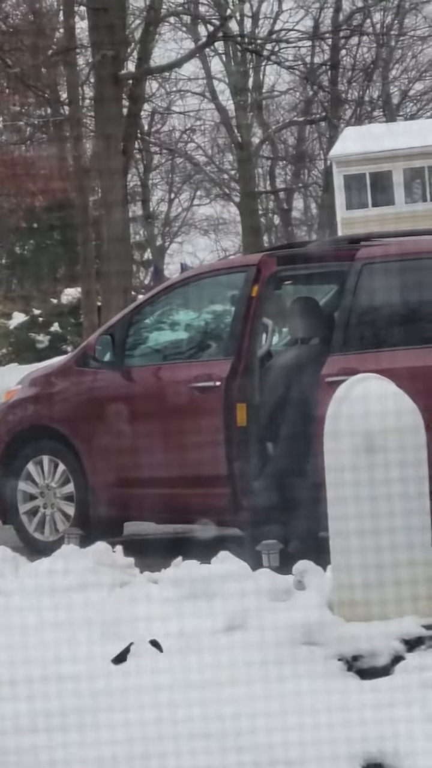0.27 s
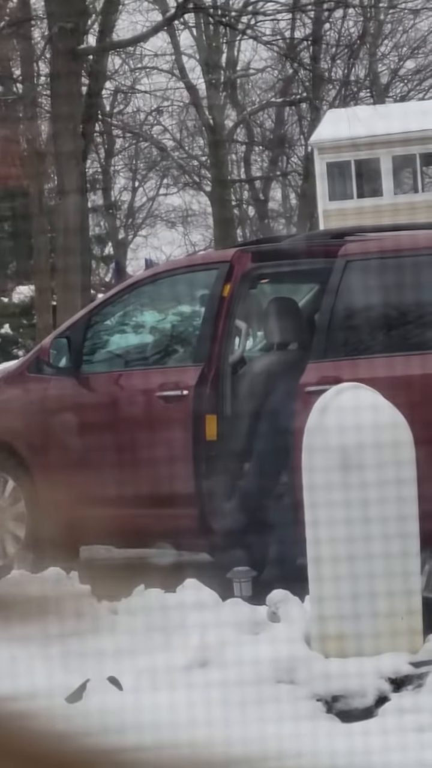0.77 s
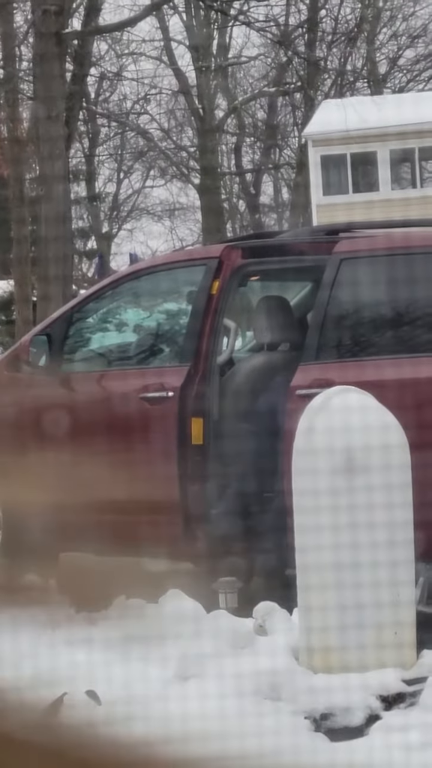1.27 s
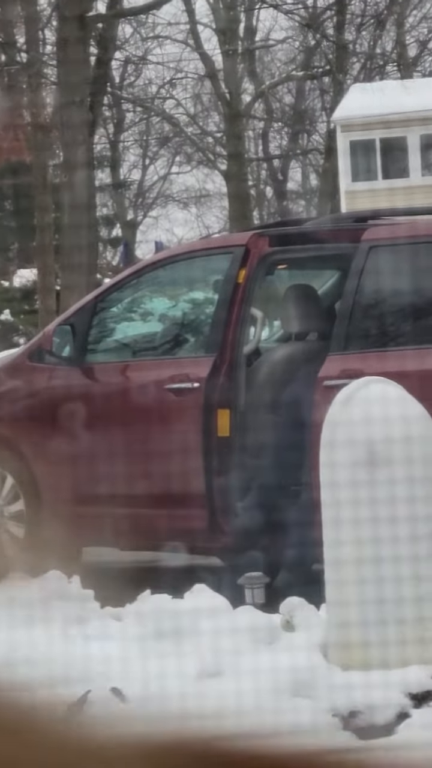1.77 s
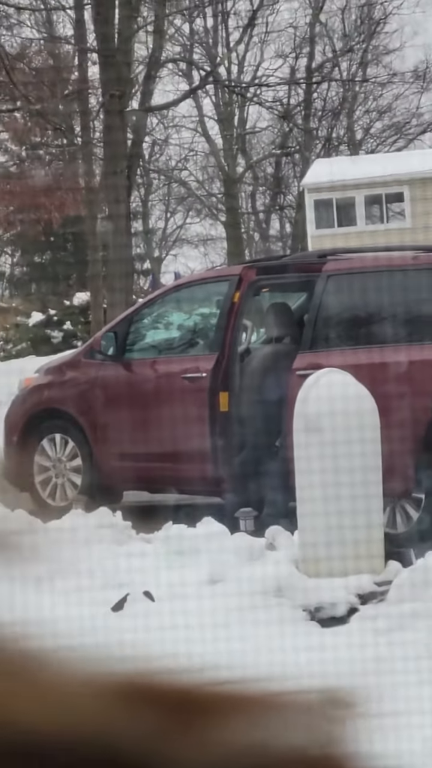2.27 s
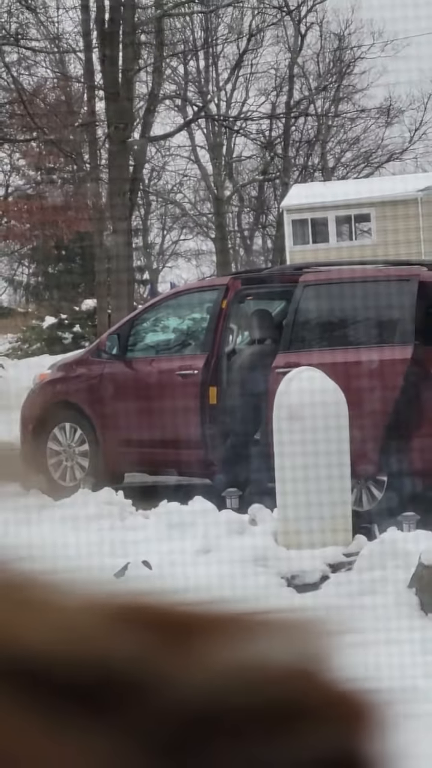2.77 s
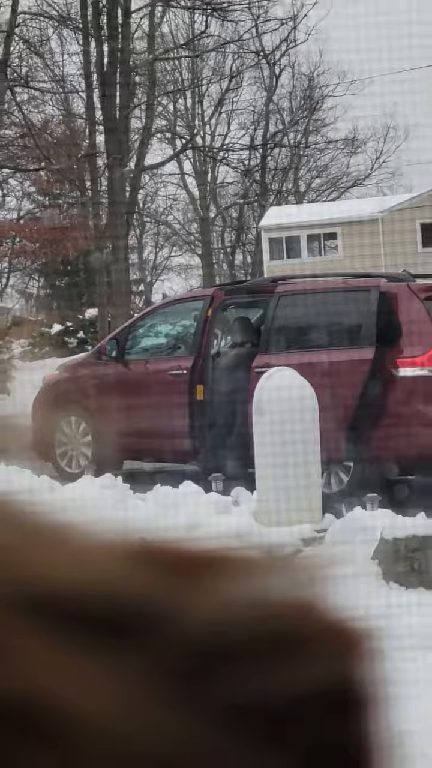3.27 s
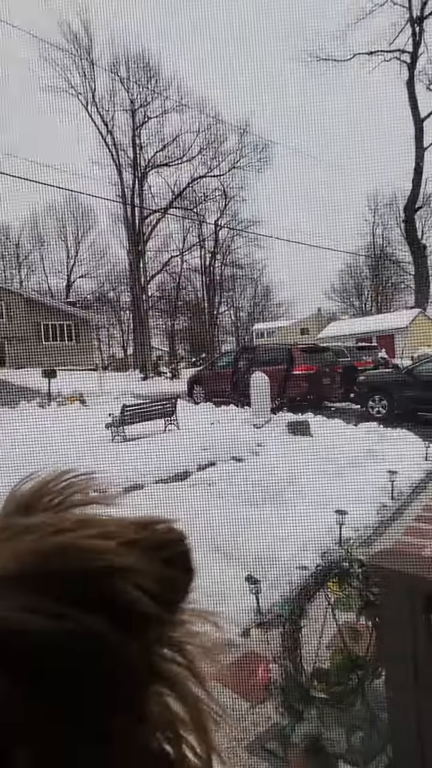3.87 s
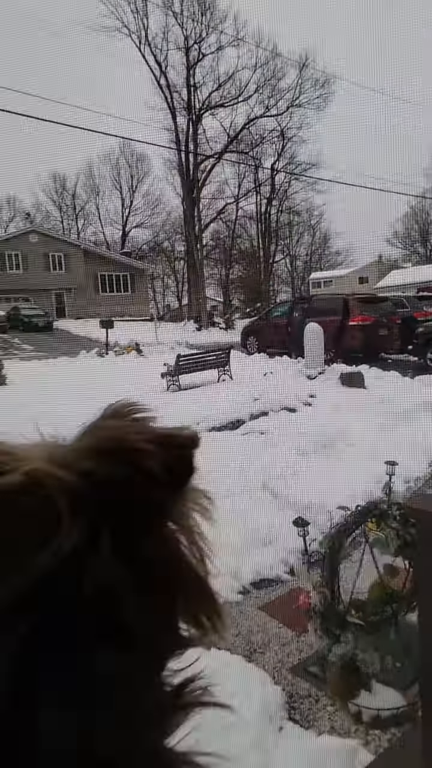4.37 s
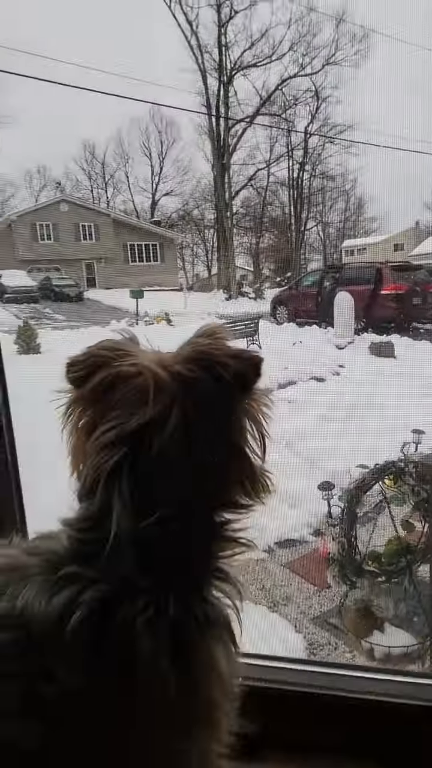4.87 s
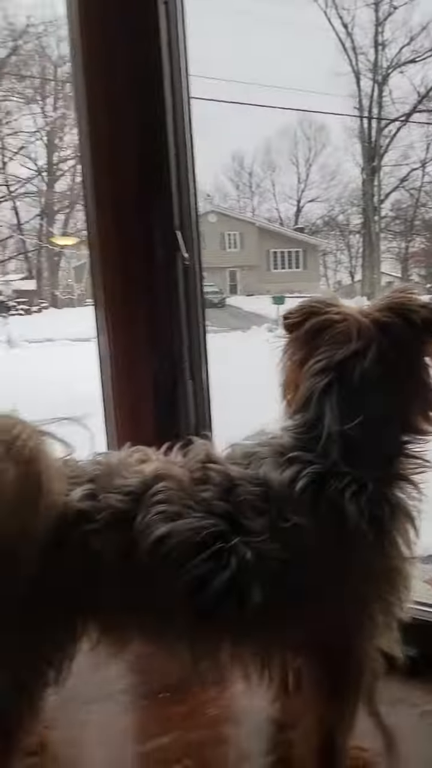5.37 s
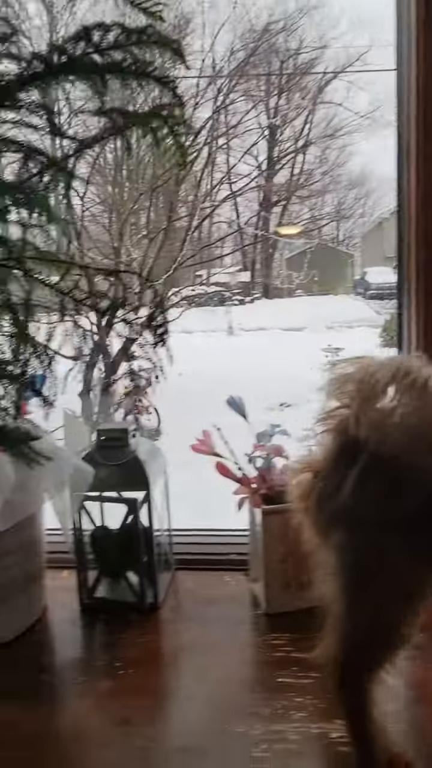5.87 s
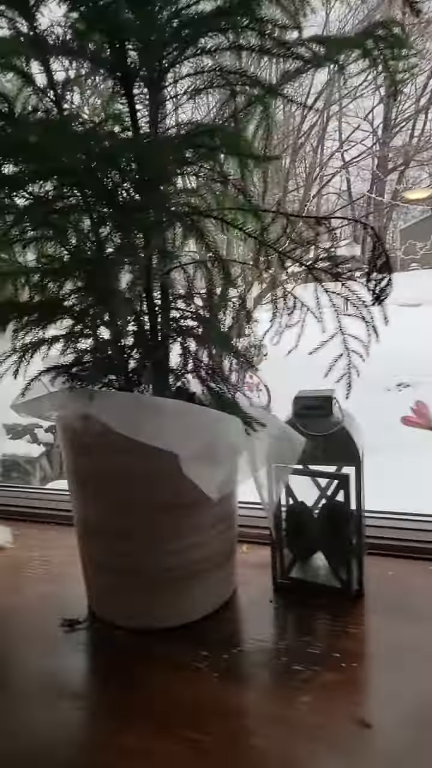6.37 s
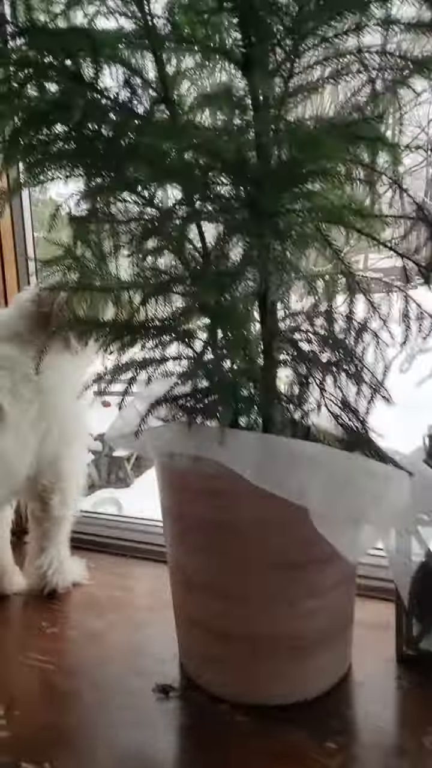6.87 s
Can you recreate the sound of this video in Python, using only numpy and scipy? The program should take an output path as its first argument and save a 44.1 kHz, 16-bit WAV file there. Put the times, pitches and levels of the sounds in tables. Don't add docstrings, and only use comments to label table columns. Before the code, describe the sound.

Several small dogs bark, yelp and howl excitedly over one another in a hard-floored room, then fade to a growl and one low woof.

```python
import sys
import numpy as np
from scipy import signal
from scipy.fft import rfft, irfft, next_fast_len
from scipy.io import wavfile
from scipy.ndimage import uniform_filter1d, minimum_filter1d, map_coordinates

SR = 44100
rng = np.random.default_rng(int(sys.argv[2]) if len(sys.argv) > 2 else 0)


def invert_db(x):
    u = np.asarray(x, float) / 20
    return 10 ** u


def store_pcm(level_fs):
    pcm = np.round(np.clip(level_fs, -1, 1) * 32767).astype(np.int16)
    wavfile.write(sys.argv[1], SR, np.atleast_2d(pcm).T)


N = 314433

# (frequency [Hz], density [dB per Hz])
TEETH_HISS = [(1500, -38.5), (2600, -13), (3300, -11.5), (4000, -17), (5200, 3.5), (7000, -1.5),
              (8400, -1.5), (10600, -16), (12400, 1.5), (14500, -2.5), (15700, -13)]
# (frequency [Hz], share [0-1])
MOUTH_RING = [(1500, 0.63), (1950, 0.16), (2250, 1.1), (2650, 0.37), (3300, 0.32), (5000, 0.05)]


def unit(x):
    return x / np.sqrt(np.mean(x ** 2) + 1e-20)


def along(points, hz):
    f, v = np.transpose(points)
    return np.interp(np.log(hz + 1), np.log(f + 1), v)


def curves(rows):
    s, *columns = np.transpose(rows)
    start = round(s[0] * SR)
    t = np.arange(start, min(N, round(s[-1] * SR))) / SR
    return start, [np.interp(t, s, column) for column in columns]


def wobble(size, rate):
    return map_coordinates(rng.standard_normal(3000), [np.arange(size) * rate / SR])


def filtered(x, response):
    n = x.shape[-1]
    m = next_fast_len(n + 8192)
    return irfft(rfft(x, m) * response(np.fft.rfftfreq(m, 1 / SR)), m)[..., :n]


def resonant(modes):
    def response(f):
        total = 0
        for k, (centre, width, db) in enumerate(modes):
            damping = 1j * f * width
            total = total + (-1) ** k * invert_db(db) * damping / (centre * centre - f * f + damping)
        return total
    return response


def hiss(spectrum, size):
    return unit(filtered(rng.standard_normal(size), lambda hz: invert_db(along(spectrum, hz))))


def fade(size, s):
    k = np.arange(size)
    return np.clip(np.minimum(k, size - k) / (s * SR), 0, 1)


def sung_partials(hz, turn, first_db, second_db, breath_db, rough, ring_db):
    # (frequency [Hz], level [dB])
    overtones = [(1200, -1), (2000, 4.5), (2450, -7), (2800, -10.5), (3300, -8), (4300, -23.5),
                 (5500, -21.5), (8500, -19.5), (10500, -32.5), (12500, -29), (15500, -27)]
    n = len(hz)
    k = np.arange(3, 25)[:, None]
    coarse = hz[::16]
    shimmer_db = 3.5 * np.array([wobble(len(coarse), 16 * 14) for _ in k])
    upper_db = (breath_db - 15 * rough)[::16] + along(overtones, k * coarse)
    upper_db = upper_db + ring_db * along(MOUTH_RING, k * coarse) + shimmer_db
    level = np.repeat(invert_db(upper_db) * (k * coarse < SR / 2), 16, axis=1)[:, :n]
    upper = level * np.sin(k * turn + rng.uniform(0, 2 * np.pi, k.shape))
    voice = invert_db(first_db) * np.sin(turn) + invert_db(second_db) * np.sin(2 * turn + 2.9) + upper.sum(0)
    voice = voice * np.sqrt(2) * invert_db(6 * rough * wobble(n, 200) + 1.5 * wobble(n, 40))
    return voice * (1 + np.clip(1.3 * (rough - .12), 0, 1) * np.cos(turn / 2))


def throat_rasp(gate, first_db, second_db, rough, ring_db):
    # (frequency [Hz], width [Hz], level [dB])
    throat = [(650, 198, 10), (1080, 300, 15.5), (1404, 83, 11), (1950, 130, -26), (2450, 300, -61)]

    def response(f):
        low_cut = f ** 2 / (f ** 2 + 450 ** 2)
        high_cut = 1 / (1 + (f / 2700) ** 6)
        return resonant(throat)(f) * invert_db(ring_db * along(MOUTH_RING, f)) * low_cut * high_cut

    chaos = unit(filtered(gate * rng.standard_normal(len(gate)), response))
    effort = np.hypot(invert_db(first_db), invert_db(second_db))
    return 1.1 * rough * effort * chaos


def voiced_breath(gate, breath_db, rough):
    n = len(gate)
    jaw_db = 8.3 * rng.standard_normal(40)
    hush_db = -9 * np.clip(1 - 6 * rough.max(), 0, 1)

    def response(f):
        jaw = np.interp(f, np.linspace(0, SR / 2, len(jaw_db)), jaw_db)
        return invert_db(jaw + hush_db / (1 + (f / 7000) ** 6))

    air = filtered(hiss(TEETH_HISS, n), response)
    return invert_db(breath_db + 1.0 + 3.36 * wobble(n, 70)) * gate * unit(air)


def call(rows, gain_db, rough, ring_db):
    start, (hz, first_db, second_db, breath_db) = curves(rows)
    n = len(hz)
    hz = uniform_filter1d(hz, size=900, mode="nearest")
    rough = np.clip(rough * np.clip(hz / hz.max(), 0, 1) ** 0.52, 0, 1)
    hz = hz * np.exp(.004 * wobble(n, 60) + .16 * rough * wobble(n, 250))
    turn = 2 * np.pi * np.cumsum(hz) / SR
    gate = 0.4 + 0.38 * np.cos(turn)
    voice = sung_partials(hz, turn, first_db, second_db, breath_db, rough, ring_db)
    voice = voice + throat_rasp(gate, first_db, second_db, rough, ring_db)
    voice = voice + voiced_breath(gate, breath_db, rough)
    return start, invert_db(gain_db) * fade(n, 0.001) * voice


def woof():
    # (time [s], pulse rate [per s], level [dB], breath [dB])
    low_bark = [
        (6.735, 150, -38, -75),
        (6.746, 105, -19, -61.5),
        (6.757, 150, -15.5, -54.5),
        (6.766, 215, -10, -56),
        (6.79, 236, -13.5, -49),
        (6.802, 225, -11, -30),
        (6.812, 140, -12.5, -40.5),
        (6.825, 190, -27, -48.5),
        (6.99, 240, -52, -62.5),
    ]
    # (frequency [Hz], width [Hz], level [dB])
    muzzle = [(225, 80, -14), (700, 65, 0), (1400, 150, -17), (2450, 200, -24)]
    # (frequency [Hz], density [dB per Hz])
    snort = [(600, -42), (1100, -8), (1500, 0.5), (2000, -9.5), (3500, -13), (5000, -38.5)]
    start, (rate, db, breath_db) = curves(low_bark)
    n = len(db)
    cycles = np.cumsum(rate * np.exp(0.037 * wobble(n, 120))) / SR
    closing = np.diff(np.floor(cycles), prepend=0)
    flow = closing * invert_db(1.54 * wobble(n, 134)) + 0.0113 * rng.standard_normal(n)

    def soft_muzzle(f):
        return resonant(muzzle)(f) / (1 + 1j * f / 2200) ** 2

    voice = filtered(invert_db(db + 43.5) * np.sqrt(200 / rate) * flow, soft_muzzle)
    puff = invert_db(breath_db) * (hiss(TEETH_HISS, n) + 3.1 * hiss(snort, n))
    return start, fade(n, 0.0022) * (voice + puff)


def growl(rows, flap_hz):
    # (frequency [Hz], width [Hz], level [dB])
    chest = [(100.5, 50, -11), (200, 140, 8), (324, 30.3, 21), (560, 150, -51.5)]
    start, (db, breath_db) = curves(rows)
    n = len(db)
    beat = np.cumsum(flap_hz * np.exp(0.57 * wobble(n, 5))) / SR % 1
    flaps = invert_db(-22 * beat) * rng.standard_normal(n)
    body = invert_db(db - 5.5) * unit(filtered(flaps, resonant(chest)))
    puffs = invert_db(breath_db - 9.5) * unit(invert_db(-14 * beat) * hiss(TEETH_HISS, n))
    return start, fade(n, 0.01) * (body + puffs)


def paired(two):
    # (frequency [Hz], likeness [0-1])
    alike = [(60, .8), (250, 1), (500, 0.15), (15000, 0.026)]

    def mid_side(hz):
        turn = np.arccos(np.clip(along(alike, hz), -1, 1)) / 2
        return np.array([np.cos(turn), np.sin(turn)])

    mid, side = filtered(two, mid_side)
    return np.array([mid + side, mid - side])


def room(x, lead_s, walls_db, tail_db):
    # (frequency [Hz], time to fall 60 dB [s])
    decay = [(150, 0.43), (600, 0.54), (2000, .55), (5000, 0.52), (12000, 0.38)]
    n = SR * 2 // 3
    hz, t, z = signal.stft(rng.standard_normal((2, n)), SR, nperseg=256)
    dying = z * invert_db(-60 * t / along(decay, hz)[:, None])
    tail = signal.istft(dying, SR, nperseg=256)[1][:, :n]
    tail = tail * np.clip(np.arange(n) / (0.0052 * SR), 0, 1)
    answer = invert_db(tail_db) * tail / np.linalg.norm(tail[0])
    answer[[[0], [1]], rng.integers(40, 500, (2, 7))] += invert_db(walls_db) * rng.standard_normal((2, 7))
    answer = paired(answer)
    half_lead = round(lead_s * SR / 2)
    answer[0, 30 - half_lead] += 1
    answer[1, 30 + half_lead] += 1
    return signal.fftconvolve(x[None], answer, axes=1)[:, 30:]


def add(out, start, sound):
    part = out[:, start:start + sound.shape[1]]
    part += sound[:, :part.shape[1]]


def panned(pan_db):
    return invert_db([[pan_db / 2], [-pan_db / 2]])


def dogs():
    # (time [s], pitch [Hz], first partial [dB], second partial [dB], breath [dB])
    howler = [
        [(0.0, 543, -15, -13.5, -33.5), (0.04, 606.8, -8.5, 3.5, -26), (0.08, 649.4, -9, -14, -28),
         (0.14, 582.5, -20.5, -16.5, -44.5), (0.24, 641, -15.5, -24.5, -40), (0.31, 587, -31.5, -24, -46),
         (0.4, 617, -16.5, -22.5, -41.5), (0.5, 622.6, -38, -39.5, -51), (0.55, 580, -38, -66, -82.5)],
        [(1.375, 234.5, -41, -64.5, -76.5), (1.4, 385, -15.5, -23.5, -46.5), (1.43, 600, -1, 12.5, -14.5),
         (1.475, 662, -23.5, -10, -23), (1.52, 569.5, -33.5, -46, -57), (1.56, 281, -25, -15.5, -86),
         (1.59, 272, -27.5, -44, -55)],
        [(1.595, 269.4, -50.5, -43, -84), (1.62, 482, -16, -27, -46.5), (1.66, 621, -22.5, -2.5, -31),
         (1.72, 673.7, -19.5, -35, -33.5), (1.78, 627, -12.5, -45, -45.5), (1.86, 679.2, -7, -27, -32.5),
         (1.92, 632, -19.5, -35, -43), (1.97, 599.7, -28, -30, -50), (2.06, 652, -13, -22, -45.5),
         (2.17, 568.2, -35, -39, -51.5), (2.3, 623, -23, -25, -53.5), (2.37, 652, -25.5, -70.5, -61.5)],
        [(2.62, 203, -32, -29.5, -65), (2.66, 360, -27, -35.5, -51.5), (2.71, 543.4, -8.5, -13, -30.5),
         (2.75, 476, -23.5, -28, -57.5), (2.79, 286.3, -24, -18, -30.5), (2.88, 119.1, -33, -82, -38)],
        [(3.635, 281, -78.5, -26, -66), (3.66, 490.5, -12, -18.5, -44.5), (3.7, 619.3, -16.5, -1, -21),
         (3.76, 701.6, -14.5, -28.5, -33.5), (3.83, 582, -18.5, -23, -39), (3.92, 650, -3.5, -21.5, -26),
         (3.99, 577, -18.5, -7.5, -28.5), (4.045, 456, -22.5, -26.5, -30.5), (4.1, 577.6, -20.5, -26.5, -48),
         (4.15, 625, -10.5, -18.5, -36.5), (4.24, 597, -38, -35, -45)],
        [(4.56, 224, -42, -55, -78.5), (4.585, 414.5, -23.5, -26, -49.5), (4.62, 560.3, -18.5, -19.5, -30),
         (4.67, 613.6, -19, -17, -28.5), (4.73, 574, -27.5, -33, -43), (4.79, 201, -43.5, -57.5, -66.5)],
        [(5.32, 556.4, -47.0, -53, -61.5), (5.35, 640.5, -8, -7.5, -22), (5.41, 642.3, -18, -19.5, -34),
         (5.49, 291.5, -48.5, -37.5, -73)],
        [(5.61, 287, -31.5, -28.5, -76), (5.64, 512.3, -15.5, -20, -35.5), (5.69, 641, -12, 1, -18.5),
         (5.75, 617.2, -23.5, -25.5, -48), (5.8, 297, -30.5, -21, -81), (5.87, 295.5, -32.5, -45, -83.5)],
        [(5.885, 277, -26, -28, -65), (5.93, 529, -23, -14.5, -33.5), (5.97, 614, -15.5, -9.5, -27.5),
         (6.02, 644, -21.5, -12, -36.5)],
    ]
    yelper = [
        [(0.45, 943, -49, -26.5, -30), (0.47, 969, -15, -19, -81.5), (0.51, 805, -35.5, -91, -67.5),
         (0.56, 373, -29, -44, -64), (0.66, 210.2, -28.5, -36.5, -74.5), (0.87, 113.5, -52, -52, -137)],
        [(1.14, 132.7, -29.5, -58.5, -77.5), (1.175, 338, -37, -37, -74), (1.19, 513.6, -19, -22, -41.5),
         (1.23, 702, -13.5, -20.5, -22), (1.265, 899.4, -22, -6, -28), (1.31, 668, -22.5, -54, -62)],
        [(2.3, 931, -26, -11, -51.5), (2.33, 944, -19.5, -50, -48.5), (2.38, 439.4, -35, -41, -60),
         (2.46, 272, -24.5, -41, -72), (2.56, 205, -36, -37, -76)],
        [(2.75, 206.7, -42, -39.5, -43), (2.79, 580, -14, -44.5, -48.5), (2.83, 964, -7, -6, -8),
         (2.87, 1178, -11.5, -39, -22.5), (2.93, 509, -50, -34.5, -61), (2.96, 143, -42, -46.5, -66.5),
         (3.08, 100.2, -48, -59, -66)],
        [(3.15, 840, -13.5, -40, -39.5), (3.185, 1042, -7.5, -8, -18.5), (3.215, 695, -9.5, -39, -51.5),
         (3.3, 282, -83.5, -37, -98.5)],
        [(3.365, 166, -44, -62.5, -83.5), (3.4, 854, -12, -15.5, -23.5), (3.45, 1049, -7.5, -10, -11),
         (3.5, 914, -10.5, -62, -35.5)],
        [(4.0, 1147, -26.5, -67, -20), (4.04, 959, -10.5, -30.5, -32), (4.09, 772, -51.5, -54.0, -52.5)],
        [(4.2, 880, -74, -44, -73), (4.225, 815, -17, -54, -58), (4.26, 376, -35, -41, -58.5),
         (4.33, 225.5, -26, -34, -65), (4.42, 205.4, -46, -48.5, -74.5)],
        [(4.665, 901, -39.5, -55, -46), (4.69, 947, -14, -46, -53), (4.725, 796, -15, -30.5, -67),
         (4.76, 520, -46.5, -20, -67.5)],
        [(5.12, 209.7, -53.5, -50.5, -70), (5.155, 450, -28.5, -18.5, -43.5), (5.18, 667, -2.5, -13.5, -27.5),
         (5.215, 774, -6, -29, -20.5), (5.26, 1043, -18, -22.5, -23.5), (5.3, 776, -21, -66, -51)],
        [(5.305, 813, -14.5, -50.5, -38.5), (5.34, 1140, -12, -18, -31.5), (5.41, 926, -30.5, -51, -35)],
        [(5.69, 971, -61, -62, -22), (5.73, 916, -25, -43, -26.5), (5.8, 970, -43.5, -73, -63.5)],
        [(6.07, 810, -19, -44, -33), (6.1, 876, -13, -18.5, -29), (6.14, 805, -60, -64, -44.5)],
    ]
    whiner = [
        [(3.02, 492, -66.5, -74.0, -68), (3.05, 489, -44.5, -58, -73.5), (3.09, 485.6, -44, -55.5, -67)],
        [(3.095, 486, -45.5, -57, -71), (3.11, 600, -16, -7.5, -27.5), (3.13, 843, -6.5, -24.5, -12),
         (3.18, 825, -22, -34, -30), (3.22, 865, -42, -48, -49.5)],
        [(3.385, 612, -21, -40.0, -62), (3.42, 776, -11, -43, -20.5), (3.48, 757.6, -9.5, -47, -37),
         (3.57, 368, -49, -47, -99)],
        [(3.78, 241, -73, -83, -66.5), (3.86, 216, -48, -69, -77), (3.94, 219.7, -49.5, -70.5, -71)],
        [(3.945, 764, -43.5, -78, -44), (3.97, 752, -6.5, -33, -57), (4.03, 762, -8, -23, -50.5),
         (4.05, 777, -12, -37, -55.5)],
        [(4.055, 237, -40.5, -75, -76), (4.15, 245, -53, -51.5, -83), (4.25, 265, -56, -65.0, -78)],
        [(5.49, 439, -41.5, -61, -68), (5.55, 469.5, -37, -53.5, -58.5), (5.62, 448, -43, -43.0, -67.5)],
        [(6.0, 756, -40, -34.0, -32), (6.02, 759, -15.5, -33.5, -23), (6.09, 815, -25, -48, -38.5),
         (6.11, 821, -3.5, -56, -52.5)],
    ]
    # (roughness [0-1], open-mouth ring [dB], left over right [dB])
    howls = [(0.05, 2, .3), (.03, 15, -0.8), (0.04, 15, -0.2), (.02, 2, 0.8), (0.03, -17.5, 1),
             (0.03, 9.5, -1), (0.23, -22, -0.5), (0.06, 6, -0.5), (0.05, 6, 2)]
    yelps = [(0.071, .3, .3), (.3, 2.1, -1), (0.1, .3, -4), (.2, 1.9, -.3), (0.2, .3, -1.3),
             (0.26, 1.5, 1.5), (.25, .3, 1), (0.16, .3, -1.9), (0.22, .3, -1.5), (0.2, 0.63, -1.5),
             (0.15, .3, 2), (1, .3, -3.2), (0.55, 1.6, -3.9)]
    whines = [(.03, -3.5, 16.5), (0.075, -5.5, -1), (0.56, 8.5, -0.8), (0.066, -32, -16.7), (.1, -9.5, 0),
              (0.042, -34, -5.3), (0.033, -9, -7), (0.039, -6, 0.8)]
    # (time [s], chest [dB], breath [dB])
    growls = [
        [(4.36, -34, -57), (4.51, -45.5, -56.5), (4.55, -42.5, -65.5)],
        [(4.84, -50, -62), (4.942, -75, -51), (5.1, -60, -87)],
        [(6.14, -39.5, -37), (6.21, -39.5, -58), (6.7, -48, -68.5), (6.73, -44, -67)],
    ]
    out = np.zeros((2, N))
    # calls, manner, left microphone's lead [s], room tail [dB]
    pack = ((howler, howls, .00052, -8), (yelper, yelps, .00022, -8), (whiner, whines, -.0004, -7))
    for calls, manner, lead_s, tail_db in pack:
        for rows, (rough, ring_db, pan_db) in zip(calls, manner):
            start, voice = call(rows, .3, rough, ring_db)
            add(out, start, panned(pan_db) * room(voice, lead_s, walls_db=-12, tail_db=tail_db))
    start, voice = woof()
    add(out, start, panned(-7) * room(voice, -.00045, walls_db=-23, tail_db=-13))
    for rows, flap_hz in zip(growls, (24, 28, 21)):
        start, voice = growl(rows, flap_hz)
        add(out, start, room(voice, .0003, walls_db=-2, tail_db=-2.5))
    return out


def sniff():
    # (time [s], level [dB])
    draw = [
        (0.88, -79),
        (1.048, -56.5),
        (1.146, -66.5),
        (1.19, -47.5),
    ]
    # (frequency [Hz], density [dB per Hz])
    nose = [(410, -53), (700, -41), (1070, -17), (1180, 2), (1800, -26), (2080, -3.5), (3190, -16),
            (6020, -18), (15500, -47)]
    out = np.zeros((2, N))
    start, (db,) = curves(draw)
    n = len(db)
    add(out, start, invert_db(db + 4.5) * fade(n, 0.047) * np.array([hiss(nose, n), hiss(nose, n)]))
    return out


def background():
    # (time [s], level [dB])
    handling = [(0.0, -44), (0.28, -70.5), (1.27, -45), (1.91, -60.5), (3.63, -42.5), (3.79, -63),
                (5.36, -44.5), (5.5, -55), (5.7, -56), (6.21, -65), (6.51, -49), (7.13, -59)]
    # (frequency [Hz], density [dB per Hz])
    rumble_colour = [(15, 8), (35, -34.5), (65, 8), (110, -0.5), (200, 0), (400, -49)]
    # (frequency [Hz], density [dB per Hz])
    air_colour = [(59, -50), (100, -11), (378, -16), (793, -16.5), (1530, -26), (1880, -27.5), (4120, -45),
                  (12600, -37), (15600, -41)]
    level = invert_db(np.interp(np.arange(N) / SR, *np.transpose(handling)))
    lumps = invert_db(4 * wobble(N, 9))
    rumble = paired(np.array([hiss(rumble_colour, N), hiss(rumble_colour, N)]))
    air = paired(np.array([hiss(air_colour, N), hiss(air_colour, N)]))
    return level * unit(lumps * rumble) + invert_db(-57.5) * air


def scene():
    return dogs() + sniff() + background()


def low_pass(x):
    return signal.sosfilt(signal.butter(12, 15730, fs=SR, output="sos"), x)


def record(dry):
    need = np.minimum(1, .97 / (np.abs(dry).max(0) + 1e-9))
    gain = uniform_filter1d(minimum_filter1d(need, size=441), size=221)
    finished = filtered(dry * gain, lambda hz: hz < 15730)
    return low_pass(finished)


dry = scene()
out = record(dry)
store_pcm(out)
```